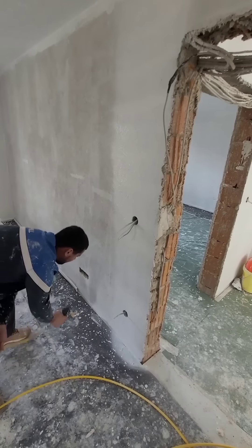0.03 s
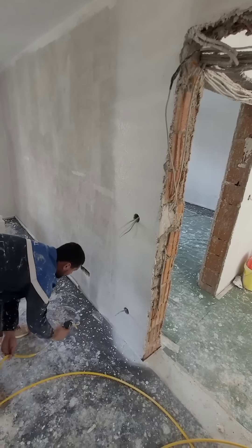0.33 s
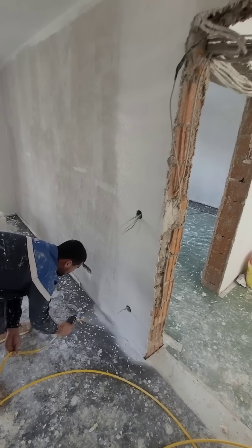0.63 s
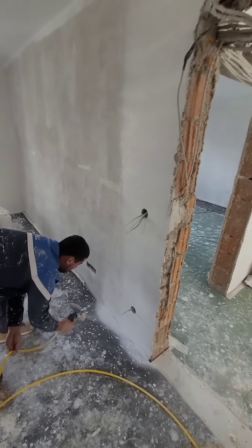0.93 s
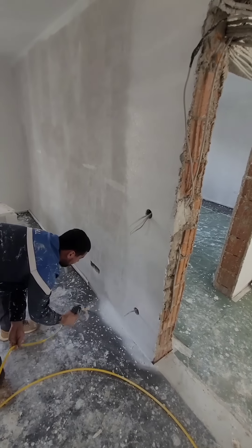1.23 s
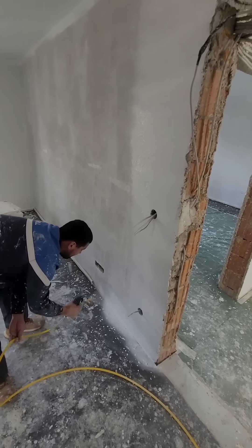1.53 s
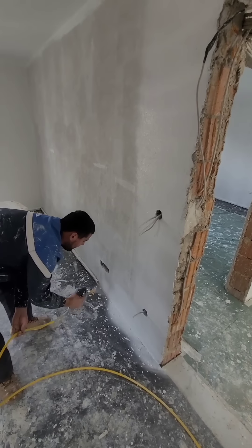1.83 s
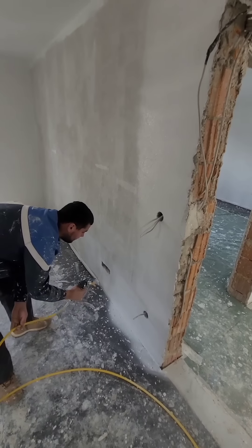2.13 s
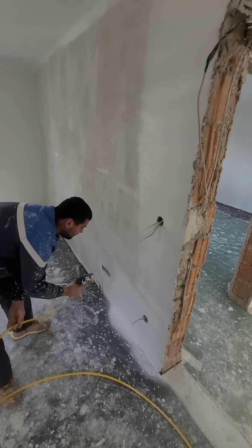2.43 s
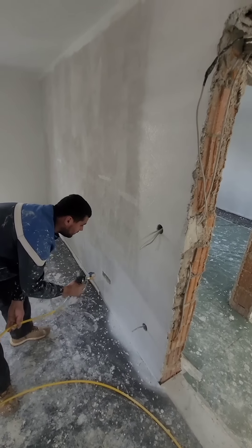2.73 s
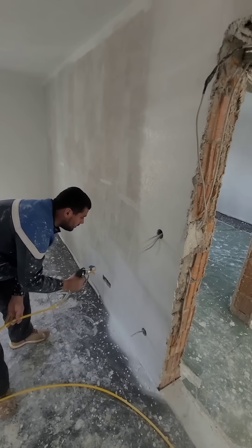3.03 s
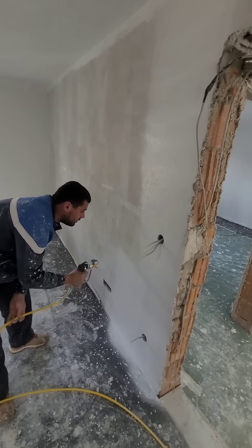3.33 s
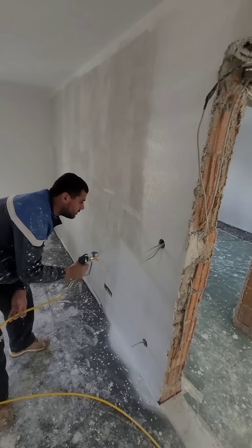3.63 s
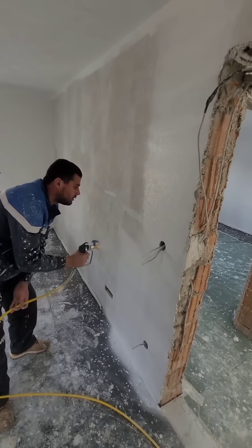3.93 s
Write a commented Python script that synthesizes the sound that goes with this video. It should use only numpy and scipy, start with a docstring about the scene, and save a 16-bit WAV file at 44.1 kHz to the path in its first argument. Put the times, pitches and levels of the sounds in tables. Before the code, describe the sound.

A paint spray gun hisses loudly and steadily over a faint pump hum.

```python
"""A pump chugs some way off in a bare room, its periodic strokes sounding harmonics over a motor's hum.
A faint leak swells, then a paint spray gun opens: its turbulent jet hisses steadily at the wall, and
the hose gives a soft thump as the pressure is released. Loaded by the flowing paint, the pump runs
a little slower and rougher. A slow gain control eases the level down after the hiss begins."""
import sys
import numpy as np
from scipy import signal
from scipy.fft import rfft, irfft, next_fast_len
from scipy.io import wavfile
from scipy.ndimage import uniform_filter1d, map_coordinates

SR = 44100
rng = np.random.default_rng(int(sys.argv[2]) if len(sys.argv) > 2 else 0)


def bounce(signal):
    """Save signal as a 16-bit WAV file at the path given by the first command-line argument."""
    frames = np.transpose(np.atleast_2d(signal))
    limited = np.clip(frames, -1, 1)
    pcm = np.round(limited * 32767).astype(np.int16)
    wavfile.write(sys.argv[1], SR, pcm)


N = 176400
TRIGGER_S = 0.5699  # the valve opens
IDLE_HZ, HUM_HZ = 24.82, 124.64  # nominal stroke rate, motor hum
WHINE_ORDER, DRONE_ORDER = 41, 10  # multiples of the stroke rate

# Likeness of the room's sound at left and right: f/Hz, correlation
COHERENCE = [(60, 0.89), (130, 0.9), (290, 0.9), (640, 0.37), (1400, 0), (4000, 0)]
# Envelope of the motor hum: t/s, level/dB
HUM_LEVEL = [(0, -42.5), (.28, -41.5), (.43, -37.5), (.57, -37.5), (.65, -43), (.73, -41), (.9, -44),
             (1, -39), (1.5, -38), (4, -37.5)]
# Stroke rate of the pump, sagging under load: t/s, f/Hz
STROKE_RATE = [(0, 24.81), (.6, 24.84), (.95, 24.9), (1.2, 24.68), (1.8, 24.62), (2.2, 24.54), (4, 24.54)]
# Common gain of strokes, rattle, drone and churning: t/s, level/dB
PUMP_GAIN = [(0, -3), (.28, -4.5), (.45, -0.5), (.57, 0), (.72, -1.5), (.9, -0.5), (1.1, -2), (1.5, -1),
             (4, 0.5)]
# Strong harmonics of the free-running pump: multiple of the stroke rate, relative level/dB
IDLE_HARMONICS = [(4, -20), (8, -19.5), (10, -18.5), (12, -13), (14, -18), (18, -17), (19, -17), (20, -15),
                  (21, -19.5), (22, -9), (23, -18), (30, -16.5), (31, -15.5), (32, -18.5), (40, -22),
                  (48, -9), (49, -18), (50, -18), (53, -15), (54, -12), (56, -12.5), (76, -26), (96, -34),
                  (114, -32)]
# Strong harmonics of the loaded pump: multiple of the stroke rate, relative level/dB
LOADED_HARMONICS = [(3, -20.5), (5, -17), (11, -18.5), (13, -19), (14, -22.5), (15, -17.5), (22, -17),
                    (31, -23), (32, -18.5), (42, -22), (45, -21), (49, -16), (54, -20), (56, -24)]
# Spectral envelope of the pump's weak harmonics: f/Hz, relative level/dB
BUZZ_SPECTRUM = [(25, -20), (400, -22.5), (700, -28), (870, -35.5), (1000, -16.5), (1100, -26.5),
                 (1300, -24.5), (1430, -32), (1520, -31), (2000, -39)]
# Envelope of the pump's whine: t/s, level/dB
WHINE_LEVEL = [(0, -59), (.12, -54), (.22, -49.5), (.32, -50), (.43, -45.5), (.65, -51), (1, -59),
               (1.15, -56.5), (4, -57.5)]
# Envelope of the pump's low drone: t/s, relative level/dB
DRONE_LEVEL = [(0, -54), (.85, -57), (1.0, -42), (1.3, -39.5), (1.7, -52), (2.05, -42.5), (2.45, -56),
               (2.62, -40.5), (2.8, -51.5), (4, -50)]
# Spectral density of the pump's mechanical noise: f/Hz, relative level/dB
RATTLE_SPECTRUM = [(15, -22), (60, -11), (160, -6), (250, -3), (450, -10.5), (650, -7), (850, -13.5),
                   (1350, -8.5), (1600, -16.5), (2300, -20.5), (3600, -25), (4900, -23.5), (6500, -31),
                   (9000, -36.5), (12000, -32.5), (15500, -40)]
# Spectral density of the leak: f/Hz, relative level/dB
LEAK_SPECTRUM = [(1000, -19), (3000, 1), (5000, 5), (7000, -3), (9000, -16), (12500, -4), (15500, -8)]
# Spectral density of the jet: f/Hz, relative level/dB
JET_SPECTRUM = [(50, -24), (300, -21), (900, -22), (1600, -19), (2300, -17.5), (3300, -18), (4000, -14),
                (4800, -12), (6500, -8.5), (7800, -4.5), (8500, -8), (9100, -9.2), (11000, -0.16),
                (12600, 1.1), (13500, 1), (15600, 0.77)]
# Stereo balance of the jet: f/Hz, left minus right level/dB
JET_BALANCE = [(700, 2), (1700, -1.5), (2400, 2.5), (4900, 2.5), (6600, 1), (7400, 2.5), (8500, 7.5),
               (9900, 5), (11300, 5.5), (12400, 3.8), (13400, 4), (15500, 3.5)]
# Spectral density of paint churning in pump and hose: f/Hz, relative level/dB
CHURN_SPECTRUM = [(30, -24), (75, -8), (170, -14), (260, 2.5), (380, -3), (600, -8.5), (1300, -15.5),
                  (2500, -49)]


def amp(db):
    """Decibels to amplitude ratio."""
    return 10 ** (np.asarray(db) / 20)


def unit(x):
    """Normalisation to rms 1."""
    return x / np.sqrt(np.mean(x ** 2) + 1e-20)


def clock():
    """Time of each sample in seconds."""
    return np.arange(N) / SR


def curve(points):
    """Linear interpolation of (t/s, value) points."""
    return np.interp(clock(), *np.transpose(points))


def along(points, hz):
    """Interpolation of (f/Hz, value) points on a logarithmic frequency axis."""
    f, v = np.transpose(points)
    return np.interp(np.log(hz + 1), np.log(f + 1), v)


def wobble(rate):
    """Smooth random modulation: a spline through `rate` knots a second."""
    coarse = clock()[::32]
    spline = map_coordinates(rng.standard_normal(1024), [coarse * rate], mode="mirror")
    return np.interp(clock(), coarse, spline)


def opened(rise_s):
    """First-order step response: 0 until the trigger, then rising to 1."""
    return 1 - np.exp(-np.maximum(clock() - TRIGGER_S, 0) / rise_s)


def swell(at_s, width_s):
    """Gaussian envelope of height 1."""
    return np.exp(-.5 * ((clock() - at_s) / width_s) ** 2)


def filtered(x, response):
    """Linear filtering: the spectrum of x times a frequency response."""
    size = next_fast_len(N + SR // 2)
    return irfft(rfft(x, size) * response(np.fft.rfftfreq(size, 1 / SR)), size)[..., :N]


def stereo_angle(hz):
    """Half the phase difference between left and right that gives the room's coherence."""
    return np.arccos(np.clip(along(COHERENCE, hz), -1, 1)) / 2


def room_noise(spectrum, ripple_db):
    """Stereo noise of rms 1; random, shifting spectral ripples stand for interfering wall reflections."""
    hz = np.fft.rfftfreq(2048, 1 / SR)[:, None]
    mid, side = signal.stft(rng.standard_normal((2, N)), nperseg=2048)[2]
    angle = stereo_angle(hz)
    mid, side = np.cos(angle) * mid, np.sin(angle) * side
    frames = np.array([mid + side, mid - side])
    ripples = uniform_filter1d(rng.standard_normal(frames.shape), size=2, axis=1)
    ripples = unit(uniform_filter1d(ripples, size=7, axis=2))
    depth_db = ripple_db / np.sqrt(1 + (hz / 13500) ** 4)  # smoother in the top treble
    pair = signal.istft(frames * amp(depth_db * ripples), nperseg=2048)[1][:, :N]
    return unit(filtered(pair, lambda f: amp(along(spectrum, f))))


def tone(turns, level):
    """A sinusoid of phase `turns` in cycles, its rms following (t/s, level/dB) points."""
    return amp(curve(level)) * np.sqrt(2) * np.sin(2 * np.pi * turns)


def motor_hum():
    """Vibration at a fixed frequency radiates a pure tone."""
    return tone(HUM_HZ * clock(), HUM_LEVEL)


def chug(turns, harmonics, waver_db, scatter_cycles=.4):
    """Harmonics superpose into one chug a stroke; the room scatters their phases and makes them waver."""
    out = np.zeros((2, N))
    for order, db in harmonics:
        apart = stereo_angle(order * IDLE_HZ) * rng.choice([-1, 1])
        phase = 2 * np.pi * (order * turns + scatter_cycles * rng.standard_normal())
        out += amp(db + waver_db * wobble(5.98)) * np.sqrt(2) * np.sin([phase + apart, phase - apart])
    return out


def buzz(turns, strong, count=80, size=2048):
    """A Fourier series of the weak harmonics between the strong ones, repeating every stroke."""
    orders = np.arange(count)
    weak = (orders > 0) & ~np.isin(orders, [order for order, db in strong] + [WHINE_ORDER])
    apart = stereo_angle(orders * IDLE_HZ) * rng.choice([-1, 1], count)
    phase = 2 * np.pi * rng.random(count) + np.array([apart, -apart])
    spectrum = weak * amp(along(BUZZ_SPECTRUM, orders * IDLE_HZ)) * np.exp(1j * phase)
    cycles = irfft(spectrum, size) * size / np.sqrt(2)
    grid = np.arange(size + 1) / size
    return np.array([np.interp(turns % 1, grid, np.append(cycle, cycle[0])) for cycle in cycles])


def rattle(stroke):
    """Broadband mechanical noise, amplitude-modulated by the strokes."""
    return amp(-46.5) * (1 + 0.1 * stroke) * room_noise(RATTLE_SPECTRUM, ripple_db=3.0)


def pump():
    """Periodic strokes radiate a harmonic series; load lowers its fundamental and shifts its timbre."""
    load = opened(rise_s=0.24)
    stroke_hz = curve(STROKE_RATE) * (1 + load * 0.00099 * wobble(4.026))
    turns = np.cumsum(stroke_hz) / SR
    stroke = np.cos(2 * np.pi * turns)
    idle = chug(turns, IDLE_HARMONICS, waver_db=0.8) + buzz(turns, IDLE_HARMONICS)
    loaded = chug(turns, LOADED_HARMONICS, waver_db=2.5) + amp(-2.5) * buzz(turns, LOADED_HARMONICS)
    mechanism = (1 - load) * amp(-37.5) * idle + load * amp(-36.5) * loaded + rattle(stroke)
    whine = tone(WHINE_ORDER * turns, WHINE_LEVEL)
    drone = tone(DRONE_ORDER * turns, DRONE_LEVEL)
    to_the_right = amp([[-1.5], [1.5]])
    return whine + amp(curve(PUMP_GAIN)) * (mechanism + (load * churn(stroke) + drone) * to_the_right)


def leak():
    """Escaping air makes faint turbulent noise as the trigger takes up its slack."""
    return amp(-59) * swell(at_s=0.52, width_s=0.086) * room_noise(LEAK_SPECTRUM, ripple_db=5.0)


def spray(room_share=.55):
    """Jet turbulence radiates a hiss: direct sound starts sharply, then reflected power builds up."""
    hiss = room_noise(JET_SPECTRUM, ripple_db=4.5)
    hiss = filtered(hiss, lambda hz: amp(along(JET_BALANCE, hz) * np.array([[.5], [-.5]])))
    build_up = np.sqrt(1 - room_share + room_share * opened(rise_s=.015))
    spurt_db = 1.5 * swell(TRIGGER_S + 0.027, width_s=0.0044)  # stored pressure escapes first
    flutter_db = 0.34 * wobble(45)
    return hiss * opened(rise_s=0.0019) * build_up * amp(-14.5 + spurt_db + flutter_db)


def hose_thump(pitch_hz=239.5, push_delay_s=0.012, push_s=0.00093):
    """A pressure release excites a few cycles of the hose's resonance, with a low push and puff of air."""
    since = clock() - TRIGGER_S
    knock = amp(-36.5) * np.sqrt(2) * np.sin(2 * np.pi * pitch_hz * since)
    band = [(pitch_hz / 10, -30), (pitch_hz / 2, -12), (pitch_hz, 0),
            (pitch_hz * 2, -17), (pitch_hz * 10, -80)]  # f/Hz, relative level/dB
    puff = amp(-37) * room_noise(band, ripple_db=2.5)
    age = np.maximum(since - push_delay_s, 0) / push_s
    push = amp(-21.5) * age * (2 - age) * np.exp(-age)  # compression, then rarefaction
    return push + swell(TRIGGER_S + 0.019, width_s=0.015) * (knock + puff)


def churn(stroke):
    """Pulsating paint flow makes low noise, which peaks while the pump catches up with the flow."""
    surge_db = 5.5 * swell(at_s=1.15, width_s=0.37)
    return amp(-42 + surge_db) * (1 + 0.13 * stroke) * room_noise(CHURN_SPECTRUM, ripple_db=1.5)


def scene():
    """Superposition of gun, hose, pump and motor in one room."""
    return leak() + spray() + hose_thump() + pump() + motor_hum()


def record(dry, knee_db=-24, slope=.31, wait_s=0.096, ramp_s=0.39, top_hz=15790):
    """Slow compression: gain falls with a delayed mean of the level above the knee; a low-pass follows."""
    power = np.abs(uniform_filter1d(np.mean(dry ** 2, axis=0), size=1024))
    excess_db = np.maximum(10 * np.log10(power + 1e-12) - knee_db, 0)
    integral = np.cumsum(excess_db) / SR
    ago = lambda s: np.interp(clock() - s, clock(), integral)
    mean_excess_db = (ago(wait_s) - ago(wait_s + ramp_s)) / ramp_s
    compressed = dry * amp(-slope * mean_excess_db)
    return filtered(compressed, lambda hz: .5 - .5 * np.tanh((hz - top_hz) / 25))


dry = scene()
out = record(dry)
bounce(out)
```